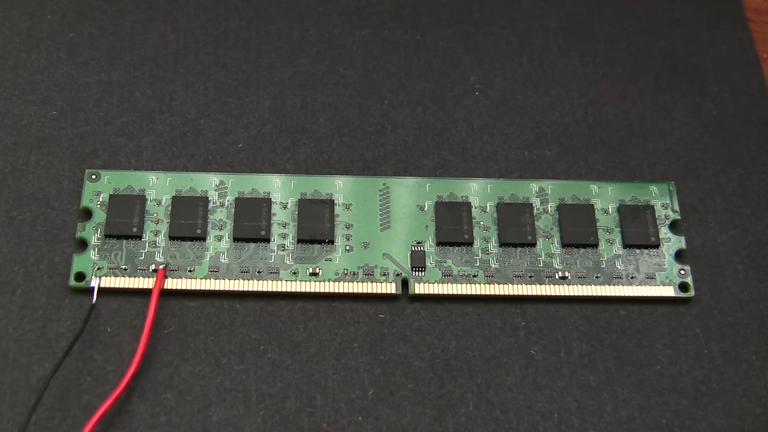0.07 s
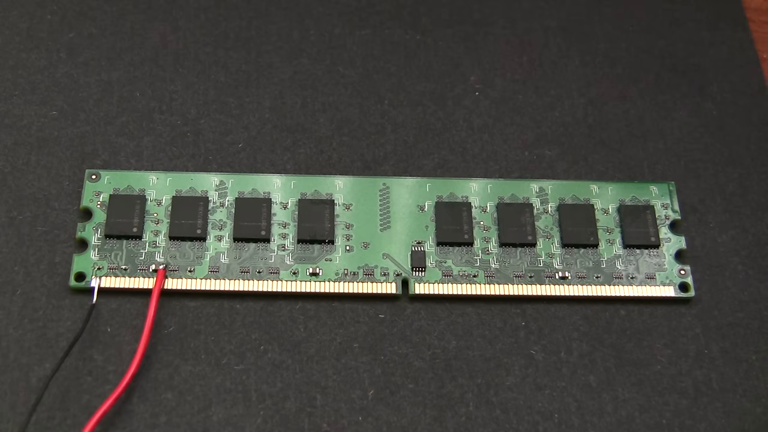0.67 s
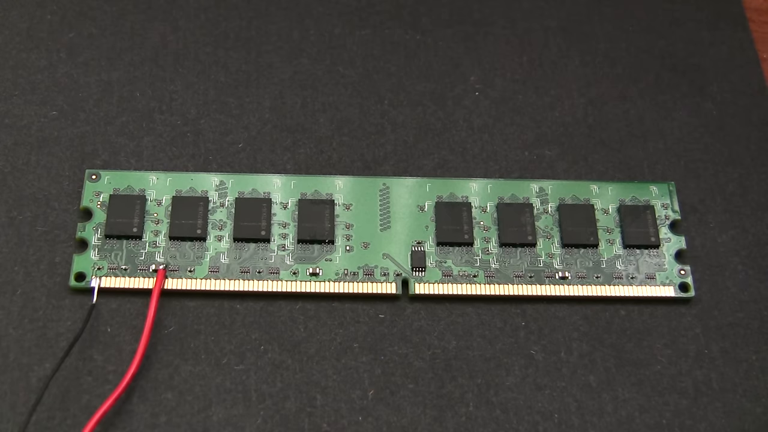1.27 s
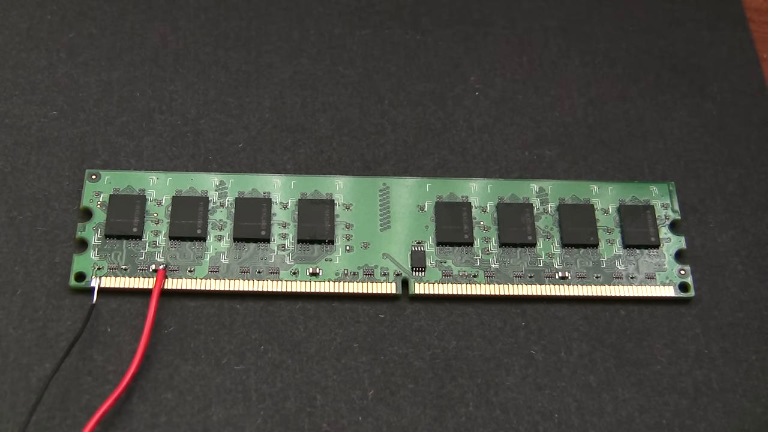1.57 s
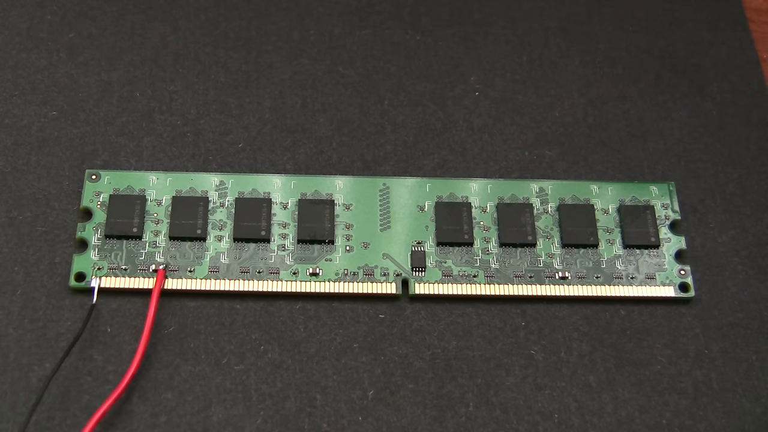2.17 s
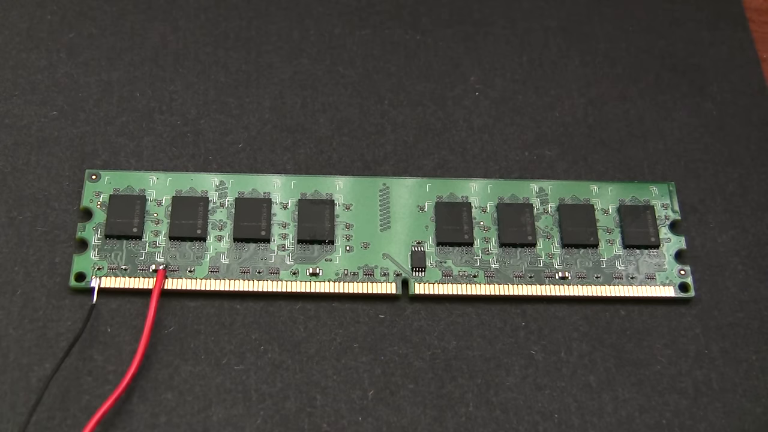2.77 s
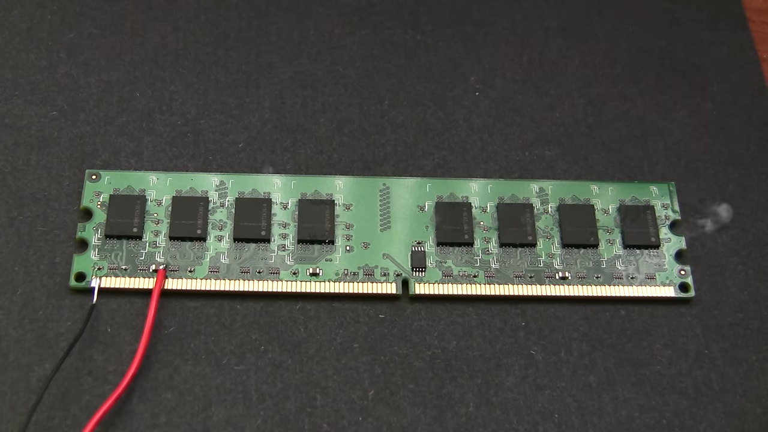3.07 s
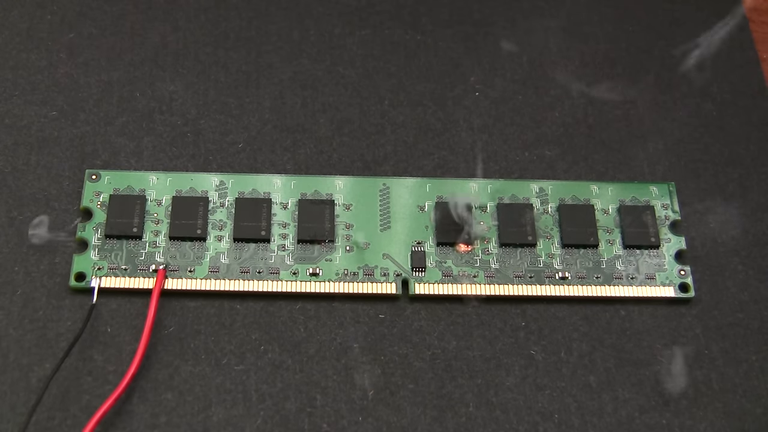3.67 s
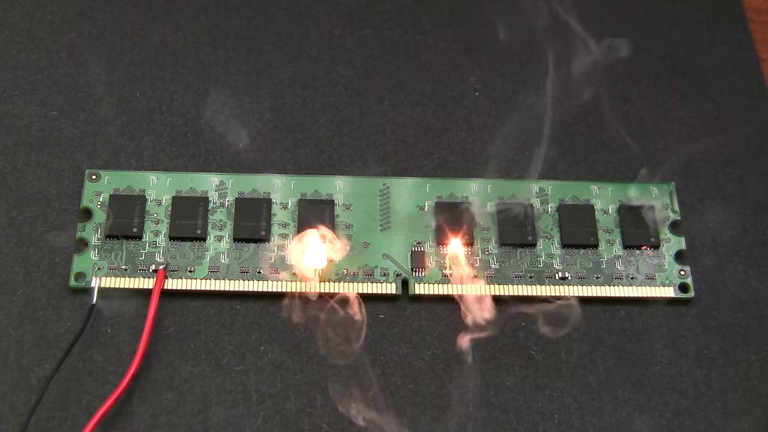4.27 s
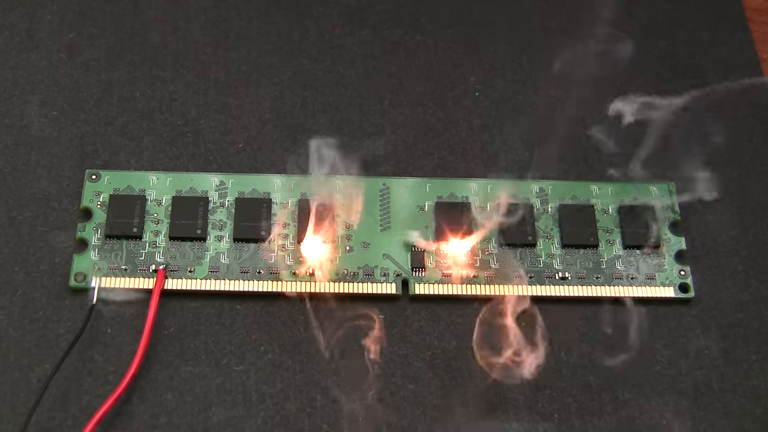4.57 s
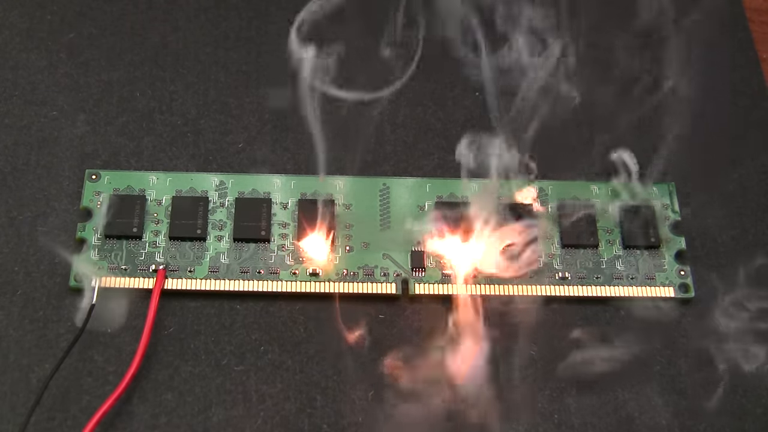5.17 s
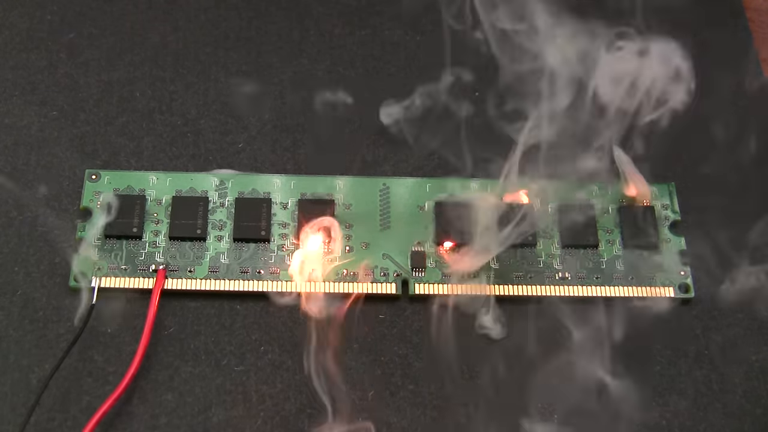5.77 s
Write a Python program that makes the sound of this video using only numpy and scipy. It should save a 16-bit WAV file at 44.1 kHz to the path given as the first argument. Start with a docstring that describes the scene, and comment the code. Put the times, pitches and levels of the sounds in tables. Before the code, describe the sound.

A power supply hums and its fan whirs softly in a small quiet room. An overheating circuit board gives a few faint creaks, then its chips start bursting in sharp, irregular snaps. Hot resin spits and fizzes in tiny bright ticks between them, over a faint flutter of small flames. Each snap has a brief room echo, and the loudest ones clip the microphone.

```python
"""A memory board burns

An overloaded board creaks, then burns with small flames on a table in a small quiet room.
Its chip cases burst in sharp snaps, and hot resin spits and fizzes in tiny ticks between them.
The room answers each snap briefly; the power supply's hum and soft fan run underneath.
The loudest snaps clip the microphone."""
import sys
import numpy as np
from scipy import signal
from scipy.fft import rfft, irfft, next_fast_len
from scipy.io import wavfile
from scipy.ndimage import uniform_filter1d, map_coordinates

SR = 44100
rng = np.random.default_rng(int(sys.argv[2]) if len(sys.argv) > 2 else 0)


def wav_out(sig):
    """Save sig, one row per channel (or a flat mono array), as 16-bit PCM at SR to the path in sys.argv[1]."""
    wavfile.write(sys.argv[1], SR, np.round(np.clip(np.atleast_2d(sig).T, -1, 1) * 32767).astype(np.int16))


N = 266364
TOP_HZ = 16100  # the highest pitch kept


# Bursting chip cases. Each row: start in seconds, level in dB, low thud in dB, high fizz in dB,
# ring pitch in Hz, room echo in dB, left side over right in dB.
SNAPS = [(2.6997, 14.5, -2, -4, 4600, -9.5, -1.5), (2.7671, -0.5, -25, 5, 5400, -7, -5),
         (2.7708, -6, -11, 7, 3000, -13, -4), (2.801, 7, 9, 3, 14300, -15.5, -1),
         (2.8267, 2, 10.5, 8, 3470, -13.5, 2), (2.8914, -1, 4, 12, 7140, -8, -10),
         (2.9064, 6.5, -3.5, 2, 11800, -11, -2.5), (3.0009, 7, -13, 11, 5550, -11.5, -1.5),
         (3.1048, -4.5, 17.5, -2, 13200, -5.5, -3), (3.36, 1.5, 5, 18.5, 6440, -9.5, -1),
         (3.4278, -1.5, -1.5, -22, 1610, -14, -4), (3.492, -1, 0.5, -8, 4850, -13, -1),
         (3.5035, -4.5, -14, 3.5, 1600, 1.5, -3), (3.513, 3, 4, 12, 3450, -23, 0),
         (3.577, -6, 5.5, -21, 5100, -15, -3), (3.6046, -4.5, -21, -5.5, 14100, -7, -5.5),
         (3.7129, -0.5, -4.5, -8, 3600, -2.5, -2.5), (3.8536, 1.5, -20, -1.5, 5400, -9, -3.5),
         (4.037, 11.5, -16, 2.5, 5900, -12, -3), (4.1869, 12.5, -1, -4.5, 1980, -15, -3),
         (4.4161, -7, -5, 1.5, 3500, -5, -3), (4.48, 3, -0.5, 9.5, 3400, -14, -4),
         (4.7767, 0.5, -2.5, -1.5, 5200, -12, -3.5), (4.8421, 15, -7, 0, 11000, -19, -5.5),
         (4.9976, 10, -10.5, -1.5, 4440, -9.5, -2), (5.0366, -5, -15, -4, 10400, -17, -1),
         (5.1255, -2.5, -8, -4.5, 5800, -11.5, -5.5), (5.1386, -0.5, -29, -10, 14400, -7, -2),
         (5.2653, 23, -12, 4, 5500, -11, -2), (5.478, -4, -2, 12.5, 4900, -10.5, -3.5),
         (5.6395, -1, -19, -3.5, 5450, -10.5, -1), (5.8513, -1, -1, 0.5, 14500, -9.5, -3.5),
         (5.908, -7, -3, 8, 3400, -14, -3.5)]

def snaps(vent_ms=0.31, vent_growth=0.21):
    """Every chip case bursts with its own size and ring; a stronger burst lets out gas for longer."""
    out = np.zeros((2, N))
    for s, db, thud_db, fizz_db, ring_hz, room_db, left_db in SNAPS:
        pulse = crack(thud_db, fizz_db, ring_hz, ring_db=3.5)
        length_ms = vent_ms * amp(vent_growth * db)
        add(out, s, amp(db) * panned(left_db) * pop(pulse, length_ms, room_db))
    return out


# The tone all cracks share. Each row: pitch in Hz, boost or cut in dB.
CRACK_TONE = [(40, -11), (150, -6.5), (500, -1.5), (1200, -.5), (1900, 0), (2700, -1.5), (5000, 0.4),
              (8200, -3), (11200, -0.43), (13200, 0), (16000, -3)]

def crack(thud_db, fizz_db, ring_hz, ring_db, sharpness=2.85, size=512):
    """A splitting case sends out one pulse of pressure, with a ring that dies quickly."""
    hz = np.fft.rfftfreq(size, 1 / SR) + 1
    thud = thud_db / (1 + (hz / 2500) ** 2)
    fizz = fizz_db / (1 + (9000 / hz) ** 4)
    ring = ring_db / (1 + (sharpness * (hz / ring_hz - ring_hz / hz)) ** 2)
    gain = amp(thud + fizz + ring)
    gain /= np.sqrt(np.mean(gain[hz < TOP_HZ] ** 2))
    gain *= amp(along(CRACK_TONE, hz))
    cepstrum = irfft(np.log(gain))
    one_sided = np.r_[cepstrum[0], 2 * cepstrum[1:size // 2]]  # nothing sounds before the break
    return -irfft(np.exp(rfft(one_sided, size)))


def gas_burst(length_ms, size=512):
    """A sudden shock, then a brief jet of gas that differs a little between left and right."""
    ms = np.arange(size) / SR * 1000
    jet = rng.standard_normal(size) + rng.standard_normal((2, size))
    jet *= np.exp(-ms / length_ms)
    jet *= np.sqrt(length_ms) / np.linalg.norm(jet, axis=1, keepdims=True)
    jet[:, 0] = 1  # the shock
    spectrum = rfft(np.roll(jet, 12, axis=1))
    # the gas stretches the pulse but leaves its overall tone alone
    tone = np.sqrt(uniform_filter1d(np.abs(spectrum) ** 2, size=7, axis=1))
    return irfft(spectrum / tone)[:, :size // 2]


def pop(pulse, length_ms, room_db, table_db=-11):
    """One burst, heard directly, off the table and from the walls."""
    paths = amp(room_db) * room_echo()
    add(paths, 0, gas_burst(length_ms))
    add(paths, .0006, amp(table_db) * table_echo())
    return signal.fftconvolve(paths, pulse[None], axes=1)


# Low thumps. Each row: start in seconds, peak level in dB, length of the first swing in ms.
THUMPS = [(2.699, -15, 0.95), (5.2653, -17, 1.4)]

def thumps(size=1024):
    """A low thump sounds under two loud, clipped snaps: one swing that reverses and dies away."""
    out = np.zeros((2, N))
    for s, db, length_ms in THUMPS:
        age = np.arange(size) / SR * 1000 / length_ms
        add(out, s, amp(db) * panned(-2.2) * (age - 1) * np.exp(-age))
    return out


# The clearer spits of hot resin. Each row: start in seconds, level in dB.
SPITS = [(2.8325, -4), (2.961, -14), (3.0597, -10), (3.19, -14.5), (3.305, -13), (3.3248, -10),
         (3.335, -24), (3.3948, -18), (3.645, -14), (3.7905, -9), (3.802, -16), (3.8485, -13),
         (3.9695, -8.5), (4.124, -20), (4.2939, -14.5), (4.47, -8), (4.5623, -9), (4.7052, -12),
         (4.908, -14), (4.971, -19), (5.2219, -15), (5.3186, -4.5), (5.569, -18), (5.8083, -13.5),
         (5.843, -6.5), (5.978, -10.5)]

def spitting():
    """Single bubbles of resin burst with a small, dry, bright tick."""
    out = np.zeros((2, N))
    for s, db in SPITS:
        pitch, place = rng.standard_normal(2)
        pulse = crack(thud_db=-4, fizz_db=11, ring_hz=5500 * np.exp(.12 * pitch), ring_db=7)
        add(out, s, amp(db) * panned(place - 2) * pop(pulse, length_ms=.45, room_db=-10))
    return out


def frying(patter_start_s=4, patter_db=-36, flurry_db=-33, scatter_s=0.032, spread_db=5):
    """Boiling resin makes a patter of tiny ticks, which crowd into a stronger flurry around each spit."""
    hot_spots = [pop(crack(0, 2.7, ring_hz, ring_db=3), length_ms=0.4, room_db=-2)
                 for ring_hz in (4540, 5560, 7160, 12100)]
    patter = [(s, patter_db) for s in rng.uniform(patter_start_s, N / SR, 240)]
    flurries = [(s + scatter_s * lag, flurry_db) for s, _ in SPITS for lag in rng.standard_normal(8)]
    out = np.zeros((2, N))
    for s, db in patter + flurries:
        size_db = spread_db * np.clip(rng.standard_normal(), -2, 2)
        add(out, s, amp(db + size_db) * hot_spots[rng.integers(len(hot_spots))])
    return out * panned(-2)


# Faint creaks of the warming board. Each row: start in seconds, level in dB, low thud in dB,
# high fizz in dB, ring pitch in Hz, length in seconds.
CREAKS = [(0.998, -35, 0, -4, 6000, .018), (1.189, -32, 4, -12, 4000, .008),
          (1.457, -26, 16, -8, 5300, 0.018), (1.991, -23.5, -19, -10, 10600, 0.019),
          (2.5663, -8, 23, -45, 2320, .003), (2.6842, -18, -1, -8, 6300, 0.0016)]

def creaks(slips=5):
    """The board creaks as it heats, before anything bursts: each creak is a quick run of tiny slips."""
    out = np.zeros((2, N))
    for s, db, thud_db, fizz_db, ring_hz, length_s in CREAKS:
        pulse = crack(thud_db, fizz_db, ring_hz, ring_db=8)
        for lag in length_s * (np.arange(slips) + rng.random(slips)) / slips:
            add(out, s + lag, amp(db) / np.sqrt(slips) * pop(pulse, length_ms=4.2, room_db=-3))
    return out * panned(-2)


# The tone of the flames. Each row: pitch in Hz, relative strength in dB.
FLAME_TONE = [(12, -20), (26, -4), (36, -15), (100, -8), (165, 0.5), (220, -4), (400, -10), (1000, -14.5),
              (4000, -39), (16000, -37)]

def flames(catch_s=3.22, grow_s=0.44, full_db=-51, flicker_db=4.5):
    """Small flames catch, grow and then flutter with a low, soft rush."""
    growth = np.clip((np.arange(N) / SR - catch_s) / grow_s, 0, 1)
    rush = noise(FLAME_TONE, likeness=[(30, 1.0), (1000, 0.66), (5000, .1)], size=N)
    return growth * amp(full_db + flicker_db * wobble(9)) * rush * panned(-4)


# How long the echo lasts. Each row: pitch in Hz, seconds to fade by 60 dB.
ECHO_FADE = [(200, 0.043), (1300, 0.29), (3500, 0.28), (9000, 0.27), (16000, 0.18)]
# The tone of the echo. Each row: pitch in Hz, relative strength in dB.
ECHO_TONE = [(200, -14.5), (1500, -4.5), (3000, -4), (5500, -1.5), (11000, -1), (16000, -4)]
# The width of the echo. Each row: pitch in Hz, how alike left and right are (1 means the same).
ECHO_LIKENESS = [(200, 0.55), (1400, 0.94), (3100, 0.51), (6800, 0.034), (15000, 0)]

def room_echo(build_s=0.0011, grain=0.097, size=8192):
    """The walls scatter the sound back, and each pitch fades at its own speed."""
    hz, slice_s, slices = signal.stft(noise(ECHO_TONE, ECHO_LIKENESS, size), SR, nperseg=128)
    fade = amp(-60 * slice_s / along(ECHO_FADE, hz)[:, None])
    tail = signal.istft(slices * fade, SR, nperseg=128)[1][:, :size]
    build_up = 1 - .5 * np.exp(-np.arange(size) / SR / build_s)
    roughness = np.exp(grain * rng.standard_normal(size))
    return unit(tail * build_up * roughness) / np.sqrt(size)


def table_echo(fade_s=0.013, size=768):
    """Sound bounces quickly off the table top and the things close to the board."""
    scatter = noise(ECHO_TONE, likeness=[(1000, 0.99), (12000, 0.06)], size=size)
    fade = amp(-60 * np.arange(size) / SR / fade_s)
    return unit(scatter * fade) / np.sqrt(size)


# The mains hum, then its second harmonic and the fan's tones. Each row: pitch in Hz, base level in dB.
SUPPLY_TONES = [(59, -53), (119, -65.5), (248, -58), (420, -63), (581, -64), (829, -67)]

def power_supply(load_boost_db=4, fan_trim_db=-1):
    """The supply hums harder once the board draws current; the hum's overtone and the fan's tones waver fuzzily
    above it."""
    t = np.arange(N) / SR
    (mains_hz, hum_db), *upper_tones = SUPPLY_TONES
    load = np.interp(t, [2.7, 4.8], [0, 1])
    hum = unit(np.sin(2 * np.pi * mains_hz * t + 0.06 * wobble(3)))
    hum *= amp(hum_db + load_boost_db * load)
    fan = np.zeros(N)
    for hz, db in upper_tones:
        swell_db, drift = 2 * wobble(14), 1.1 * wobble(14)
        fan += amp(db + fan_trim_db + swell_db) * unit(np.sin(2 * np.pi * hz * t + drift))
    return (hum + fan) * panned(-4)


# The rush of fan and room air. Each row: pitch in Hz, relative strength in dB.
AIR_TONE = [(100, -15), (125, -4), (150, -1.5), (190, -2.5), (225, -5.5), (290, -9), (560, -8), (820, -12),
            (1100, -16), (1500, -17.5), (2260, -26), (4500, -32), (9000, -37.5), (15500, -43.5)]
# A deep rumble. Each row: pitch in Hz, relative strength in dB.
RUMBLE_TONE = [(12, -13), (27, 0.5), (36, -27), (52, -1), (78, -8), (100, -12), (140, -55), (1000, -57)]
# The width of both. Each row: pitch in Hz, how alike left and right are (1 means the same).
AIR_LIKENESS = [(60, -0.17), (130, 0.9), (290, 0.49), (640, 0.61), (1410, 0.3), (3100, -0.1), (6820, -0.4),
                (15000, 0.19)]

def air(rush_db=-47.5, rumble_db=-58.5):
    """Air from the fan and the room rushes softly over a deep rumble."""
    rush = amp(rush_db) * noise(AIR_TONE, AIR_LIKENESS, N)
    rumble = amp(rumble_db) * noise(RUMBLE_TONE, AIR_LIKENESS, N)
    return (rush + rumble) * panned(-2.1)


def amp(db):
    """Turn dB into a number to multiply by."""
    return 10 ** (np.asarray(db) / 20)


def unit(x):
    """Scale a sound to an average power of 1."""
    return x / np.sqrt(np.mean(x ** 2) + 1e-20)


def along(points, hz):
    """Read a value between a table's rows, on a musical pitch scale."""
    pitches, values = np.transpose(points)
    return np.interp(np.log(hz + 1), np.log(pitches), values)


def wobble(rate, size=2048):
    """A smooth curve through `rate` random points a second."""
    points = rng.standard_normal(size)
    smooth = map_coordinates(points, [np.linspace(0, rate * N / SR, size)])
    return np.interp(np.arange(N), np.linspace(0, N, size), smooth)


def panned(left_db):
    """Left and right volumes; below zero leans right."""
    return amp([[left_db / 2], [-left_db / 2]])


def add(track, s, sound):
    """Mix a stereo sound in at s seconds."""
    start = min(max(round(s * SR), 0), N)
    part = track[:, start:start + sound.shape[1]]
    part += sound[:, :part.shape[1]]


def noise(tone, likeness, size):
    """Stereo noise with a chosen tone and left-right likeness."""
    length = next_fast_len(size)
    hz = np.fft.rfftfreq(length, 1 / SR)
    width = np.arccos(np.clip(along(likeness, hz), -1, 1)) / 2
    spectrum = rfft(rng.standard_normal((2, length))) * amp(along(tone, hz))
    mid, side = irfft(spectrum * [np.cos(width), np.sin(width)], length)[:, :size]
    return unit(np.array([mid + side, mid - side]))


def scene():
    """The burning board over the steady background."""
    return power_supply() + air() + flames() + snaps() + thumps() + creaks() + spitting() + frying()


def record(dry):
    """The microphone clips the loudest peaks, and the very highest pitches are cut away."""
    length = next_fast_len(N + 4096)
    hz = np.fft.rfftfreq(length, 1 / SR)
    treble_cut = np.clip((TOP_HZ - hz) / 400 + .5, 0, 1)
    clipped = np.clip(dry, -1, 1)
    return irfft(rfft(clipped, length) * treble_cut, length)[:, :N]


dry = scene()
out = record(dry)
wav_out(out)
```